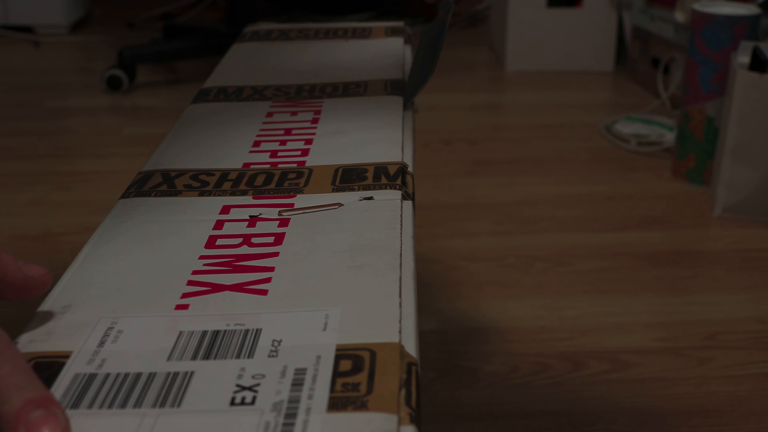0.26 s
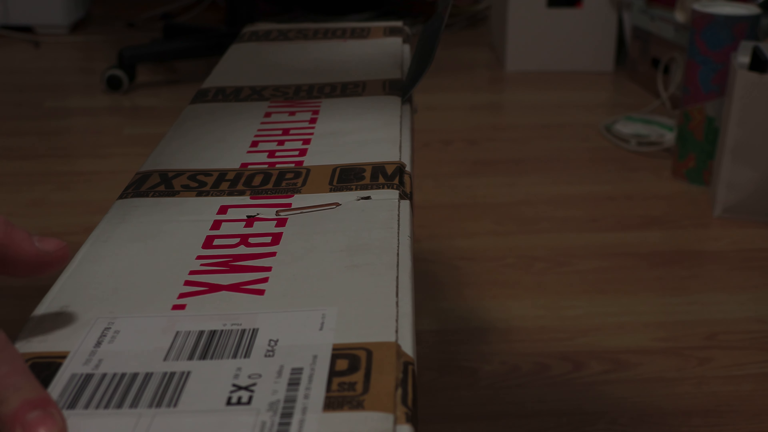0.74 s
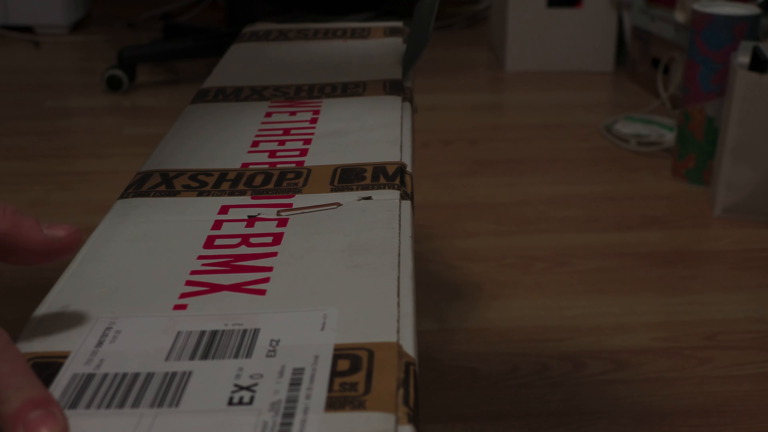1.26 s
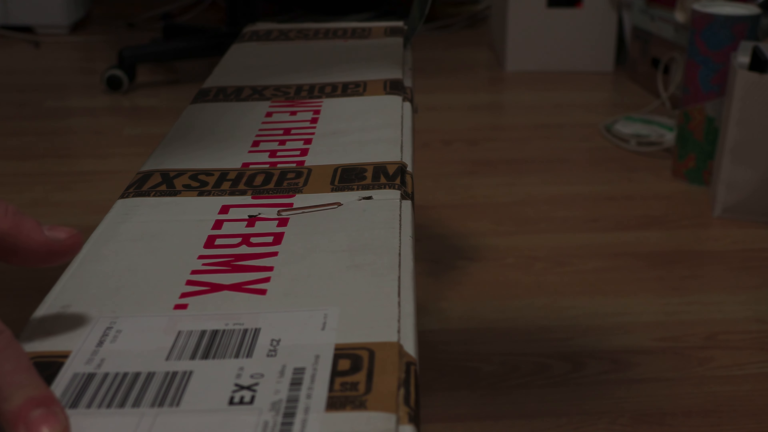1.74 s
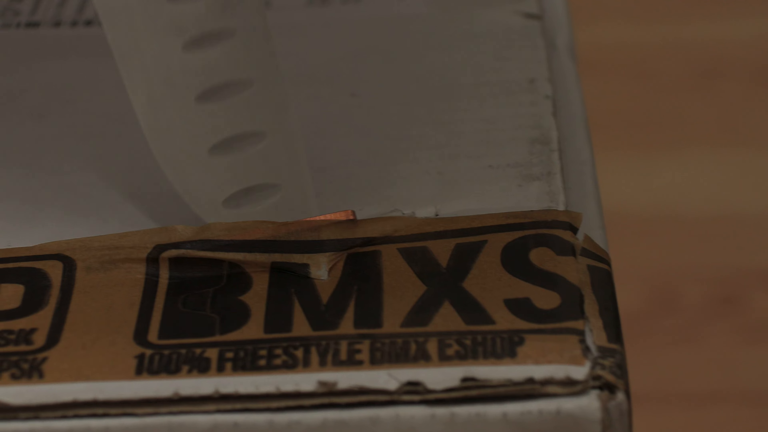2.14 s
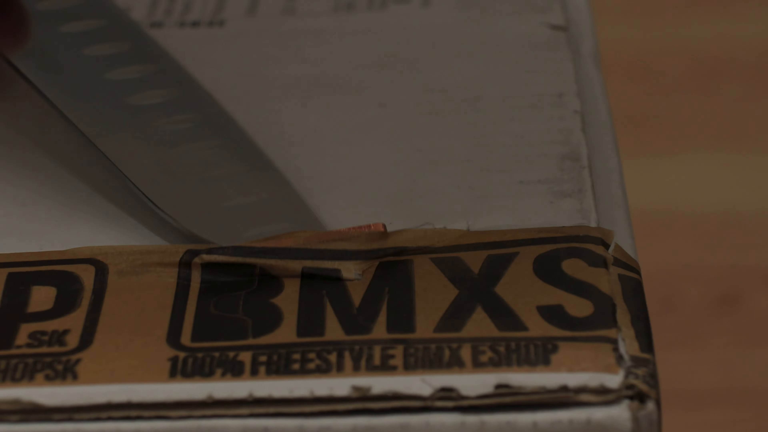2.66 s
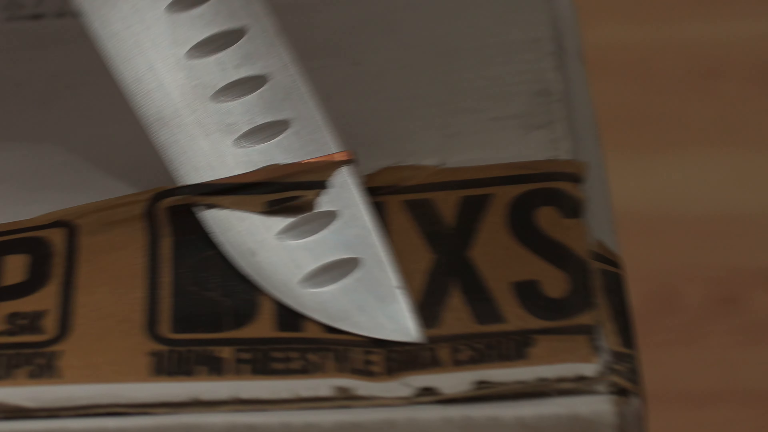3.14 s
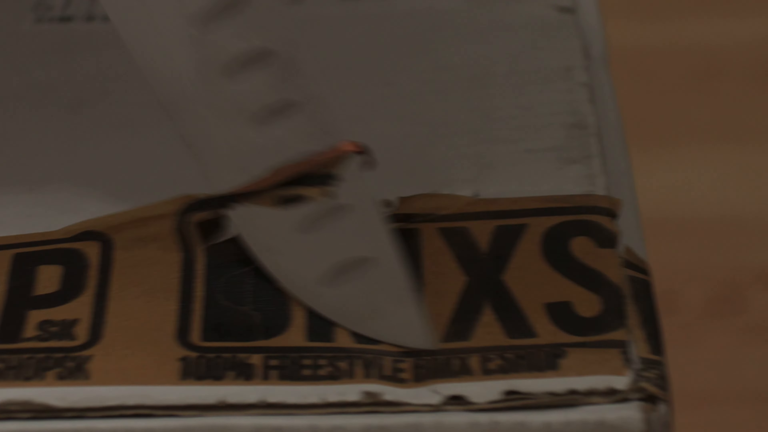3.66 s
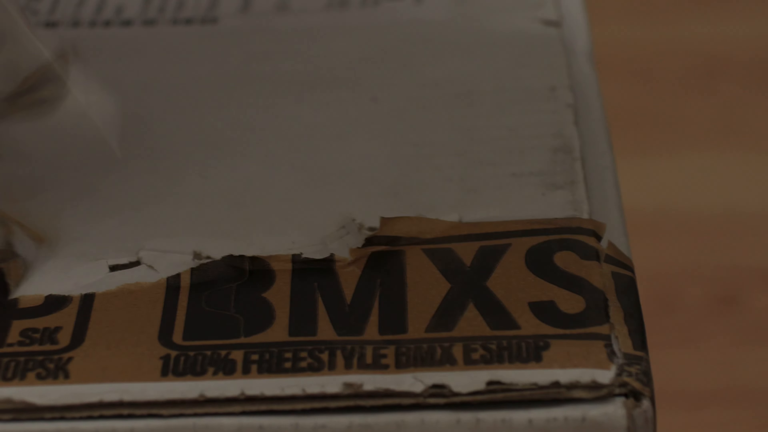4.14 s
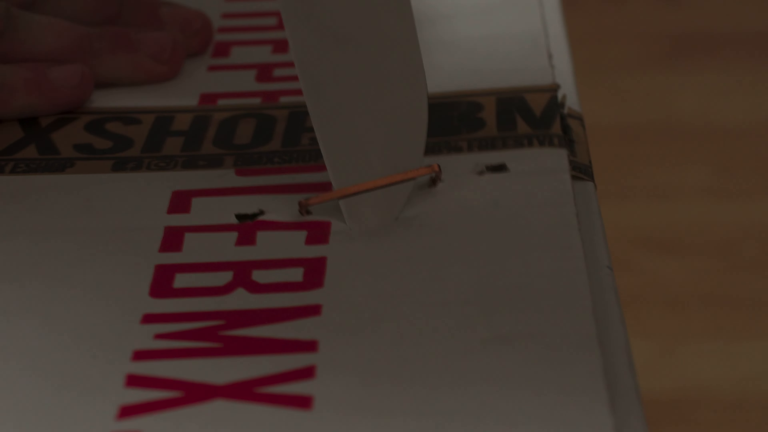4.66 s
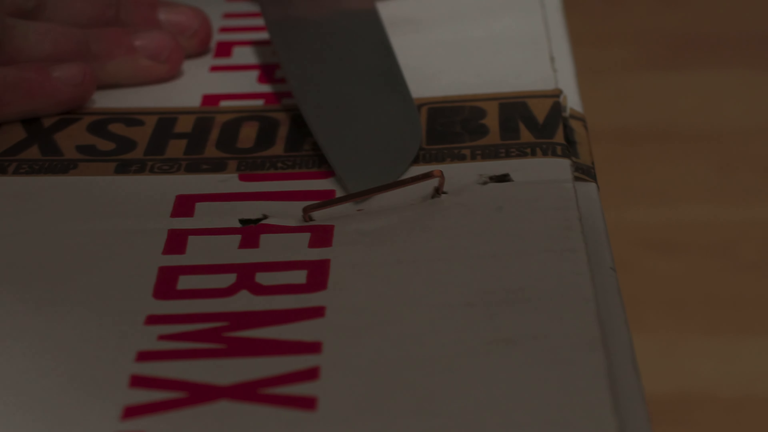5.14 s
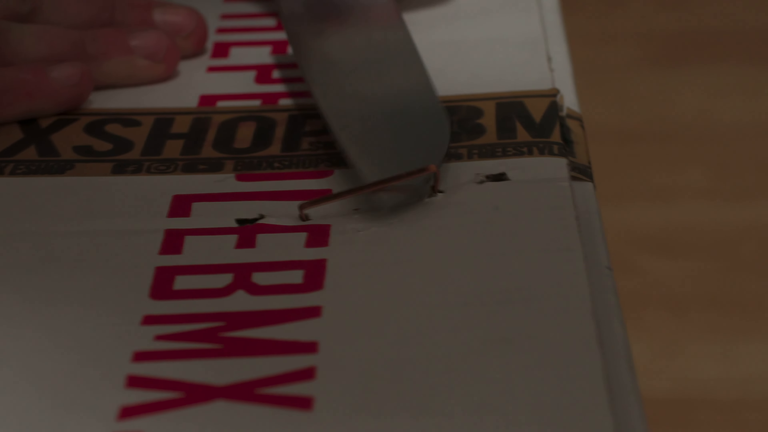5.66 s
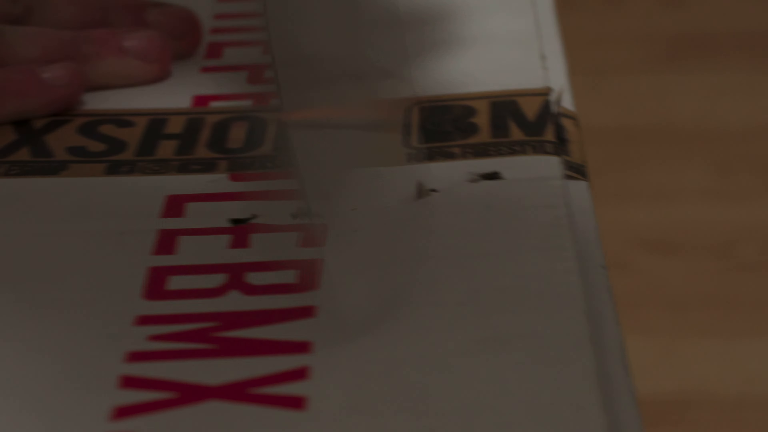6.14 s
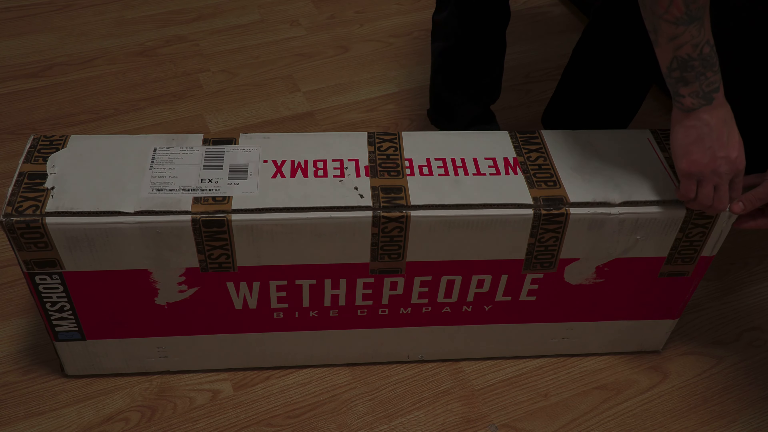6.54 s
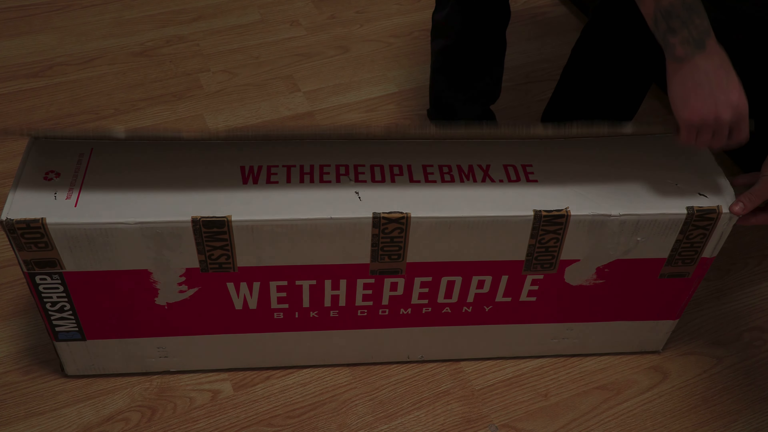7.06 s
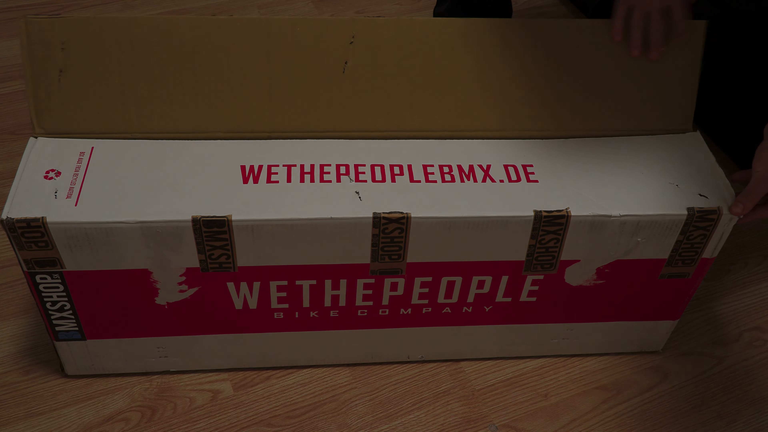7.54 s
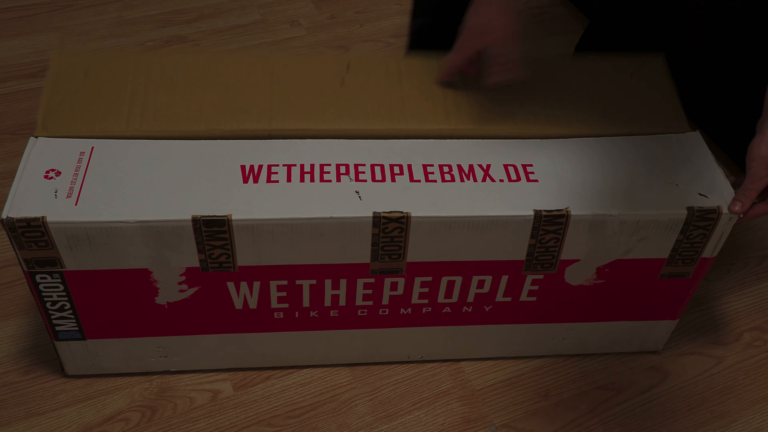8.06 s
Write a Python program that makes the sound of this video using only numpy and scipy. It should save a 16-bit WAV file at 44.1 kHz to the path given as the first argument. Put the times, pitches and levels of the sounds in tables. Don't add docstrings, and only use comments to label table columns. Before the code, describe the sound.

Quiet handling of a big cardboard carton comes first, then a loud tape crack and some knocks. The sound cuts abruptly to a blade grating against board, thudding and snapping through it in irregular bursts. More prying ends in a hollow boom and short metallic jingle. A last cut brings crisp lid pops, gentle cardboard rustle and soft bumps. Recorded near, in a lightly echoing room with low background hiss.

```python
import sys
import numpy as np
from scipy import signal
from scipy.fft import rfft, irfft, next_fast_len
from scipy.io import wavfile
from scipy.ndimage import uniform_filter1d

SR = 44100
rng = np.random.default_rng(int(sys.argv[2]) if len(sys.argv) > 2 else 0)


def invert_db(level):
    return 10 ** (np.asarray(level, dtype=float) / 20)


def pcm_store(signal):
    levels = np.round(np.clip(np.atleast_2d(signal), -1, 1) * 32767)
    wavfile.write(sys.argv[1], SR, levels.astype(np.int16).T)


N = 366453

SHOTS = [
    0,
    1.372,
    2.122,
    4.259,
    6.44,
    8.32,
]
# level in dB, shot by shot.
RESTING_DB = [-62, -50.5, -61.5, -57.5, -86]

# frequency in Hz, density in dB per Hz.
HUSH = [(18, -60), (30, -16), (210, 1.5), (384, 1), (584, 1.5), (1460, -7.5), (1670, -10.5), (2010, -9),
        (7870, -16), (14000, -31.5), (16000, -51)]
# frequency in Hz, width in Hz, level in dB.
WHINE = [(7710, 20, 0)]
# frequency in Hz, width in Hz, level in dB.
HOUSE_TONE = [(1730, 110, 0)]
# time in seconds, level in dB.
RUMBLE = [(0.0, -69), (0.76, -81), (1.39, -44.5), (2.27, -81), (2.98, -47), (3.49, -80), (3.82, -42.5),
          (4.58, -75), (6.87, -43), (7.15, -69), (7.98, -51.5), (8.31, -53)]
# frequency in Hz, t60 in seconds.
ROOM = [(200, 0.43), (1000, 0.37), (4000, 0.51), (12000, 0.2)]
# frequency in Hz, level in dB.
WIDTH = [(60, -33), (150, -33), (380, -18), (950, -9.5), (2400, -10.5), (6000, -7.5), (10000, -3.5),
         (14000, -11)]
# lower edge in Hz, upper edge in Hz.
MICROPHONE_HZ = [209, 10500]
# lower edge in Hz, upper edge in Hz.
PUSH_HZ = [45, 130]

# frequency in Hz, width in Hz, level in dB.
LOW_BOX = [(198, 86, -1), (254, 19.8, -7.5), (310, 47.5, -3.5)]
HIGH_BOX = [(404, 76, -1), (546.2, 37.4, -2.5), (657, 60, -1.5), (772, 80, -4.5), (877, 35, -11)]
# frequency in Hz, width in Hz, level in dB.
PANEL = [(1100, 410, -13), (1425, 740, 12), (1815, 880, 10.5), (2164, 1280, 10), (2660, 1170, 5.5)]
# frequency in Hz, level in dB, t60 in seconds.
BLADE = [(4650, -7, .9), (5100, -4, .9), (5480, -10.5, .9), (6105, -11, 1), (6700, -2, 1),
         (7440, -0.5, 0.83), (7540, 0.5, 0.55), (8800, -10, 0.7), (9950, -10, 0.61), (10450, -6, .6),
         (11900, -7, .6), (12400, -5.5, .6), (13880, 2.5, 0.26), (14500, -14, 0.44)]
# frequency in Hz, density in dB per Hz.
RASP = [(1470, -71), (2500, -10.5), (3180, -1.5), (4500, -2.5), (6200, -4.5), (8400, -12), (12300, -18),
        (14800, -18), (16000, -68)]

# start in seconds, peak in dB, frequency in Hz, t60 in seconds.
RINGS = [(1.415, -21, 619, 0.08), (1.43, -29, 375, 0.19), (1.51, -36, 506, 0.18), (1.608, -30, 518, 0.081),
         (1.612, -31, 610, 0.08), (1.65, -37, 552, 0.084), (5.03, -20, 207, 0.18),
         (5.355, -32.5, 228, 0.18), (5.626, -22, 1250, 0.16), (6.2, -11, 215, 0.13), (6.28, -23, 166.5, .5),
         (5.628, -16.5, 201.4, 0.16), (5.66, -24, 191, 0.13), (2.93, -16, 543, 0.16),
         (6.12, -34, 570, 0.076), (6.673, -28, 1420, 0.19), (6.676, -30.5, 1540, .33),
         (6.684, -30, 1665, 0.13), (6.686, -24, 1800, .15), (6.69, -38, 1910, 0.24),
         (6.861, -39, 303, 0.16), (7.607, -40, 1060, 0.087), (7.61, -41.5, 1770, 0.22),
         (8.15, -38, 585, 0.1), (7.866, -28, 198.4, 0.25), (7.95, -36, 230, 0.21)]
# start in seconds, peak in dB, strongest frequency in Hz, t60 in seconds.
THUMPS = [(0.315, -30.5, 470, 0.14), (1.093, -27.5, 460, 0.31), (1.38, -29, 500, 0.039),
          (1.413, -12.5, 203, 0.14), (1.605, -24, 209, 0.23), (1.744, -28.5, 532, 0.092),
          (2.619, -19, 390, 0.045), (2.915, -8.5, 708, 0.47), (2.944, -9, 630, 0.038),
          (3.727, -10.5, 550, 0.027), (3.846, -19, 510, 0.096), (3.856, -14.5, 650, 0.053),
          (4.198, -23, 333, 0.084), (4.451, -20.5, 278, 0.047), (4.478, -20, 310, 0.064),
          (4.976, -16.5, 617, 0.065), (5.021, -11.5, 261, 0.056), (5.101, -26, 310, 0.13),
          (5.349, -23.5, 220, 0.069), (5.62, -16, 268, 0.053), (6.189, -4.5, 245, 0.078),
          (6.672, -25, 240, 0.098), (7.864, -30, 198, 0.063), (8.131, -33.5, 404, 0.025),
          (2.913, -11.5, 419, 0.3), (2.916, -28, 940, .2), (2.927, -12, 660, 0.22),
          (2.966, -16.5, 890, 0.27), (2.98, -16, 692, 0.36), (2.93, -10.5, 404, 0.32),
          (2.935, -14, 1280, .2), (2.985, -17.5, 1340, 0.2), (2.995, -22.5, 396, 0.2), (2.95, -14, 955, .2),
          (3.062, -25, 663, 0.072), (3.727, -18, 664, 0.09), (3.765, -24, 700, 0.12),
          (3.844, -18, 436, 0.11), (5.62, -9.5, 542, 0.049), (5.635, -18.5, 235, 0.22),
          (6.222, -7, 182, 0.21), (7.889, -27, 220, 0.12), (7.91, -26.5, 130, 0.27), (6.2, -13, 565, 0.28),
          (3.099, -29, 130, 0.11), (4.815, -38.5, 400, 0.11)]
# start in seconds, strength in dB, gain in dB per octave away from 7
# kHz on either side.
RATTLE = [(4.195, -38, -2), (4.246, -38.5, 1), (4.978, -52, 10), (5.023, -59, 3), (5.3, -62, 16),
          (5.623, -40, 23), (5.654, -48, 6), (6.191, -29, 9), (6.21, -27, 13.5), (6.224, -27, 1),
          (6.236, -27, 6), (6.248, -29, 2), (6.262, -19.5, -2), (6.283, -33, 1), (6.298, -28, -10),
          (6.316, -34, 4)]
# time in seconds, peak in dB, ring in Hz, treble against peak in dB.
SNAPS = [(1.0929, -23.5, 2090, -27), (1.1458, 7, 2730, -27), (1.4132, -2.5, 4040, -15),
         (1.6072, -18.5, 2840, -13), (2.1535, -14.5, 4500, -20), (2.6229, 4.5, 3700, -11),
         (2.6384, -11, 3500, -9), (2.9158, -0.5, 2330, -57), (2.9447, -4, 2430, -25),
         (3.0649, -13, 2220, -38), (3.2101, -21, 5270, -14), (3.6998, -1.5, 4030, 17),
         (3.7289, -12, 1480, -15), (3.8462, -19, 3650, -1), (3.8536, -10, 1540, -29),
         (4.1051, -14, 4600, -18), (4.1114, -24, 1980, 1), (4.3405, -9.5, 2660, -9), (4.4518, -4, 4500, 3),
         (4.4817, 5.5, 5950, -5), (4.9766, -7.5, 1760, -5), (5.0225, -7.5, 2130, 2.5),
         (5.6211, 2, 1960, -24), (5.624, 0.5, 1210, -10), (6.1898, 3, 1677, -11.5), (6.6383, -7, 5340, -18),
         (6.6742, -2, 3380, -38), (6.688, -8, 1680, -40), (6.8593, -7, 4050, -29), (7.6086, -34, 1730, -25)]
# time in seconds, peak in dB, ring in Hz.
TICKS = [(0.0473, -22, 5800), (0.1755, -26, 6720), (0.205, -24, 8500), (0.6035, -30, 6940),
         (0.6489, -29, 3040), (1.5703, -25, 2040), (1.6482, -19, 6130), (1.7444, -24, 2990),
         (1.8497, -26, 2900), (2.2044, -21, 5000), (2.2268, -25, 4180), (2.2997, -23, 6270),
         (2.7841, -28, 3370), (2.9875, -12, 9000), (3.1173, -20, 2370), (3.1597, -26, 1930),
         (3.3543, -22, 5170), (3.9804, -23, 1990), (4.0562, -21, 2320), (4.3216, -23, 5170),
         (4.4169, -21, 7610), (4.9237, -24, 3000), (5.7823, -20, 5900), (7.862, -19, 7500),
         (2.8689, -9, 5500), (3.4047, -25, 3020), (3.5374, -24, 2380), (3.678, -25, 2310),
         (3.758, -18, 6500), (4.0302, -27, 2340), (4.129, -17, 4400), (4.149, -17, 2200),
         (4.165, -16, 2200), (4.283, -32, 9500), (4.301, -32, 9000), (4.3306, -19, 5360),
         (4.5695, -20, 5630), (4.584, -19, 6000), (3.657, -25, 9000), (5.638, -6, 4900), (5.655, -9, 3800),
         (6.1928, -3, 7740), (6.6039, -29, 6000), (6.124, -27, 7500), (6.1444, -23, 5200),
         (3.2205, -23, 6000), (7.525, -32, 5000), (7.6301, -28, 6000), (8.134, -36, 3000),
         (0.009, -24, 3000), (0.028, -23, 6000), (0.275, -27, 5500), (0.32, -26, 4500), (4.789, -30, 8000),
         (4.808, -29, 9000), (5.104, -28, 9500), (7.492, -34, 4000), (5.855, -20, 4300)]
# start in seconds, length in seconds, from Hz, to Hz, level in dB.
SQUEAKS = [(0.0, 0.065, 1550, 1610, -45), (.02, 0.057, 2800, 2810, -44), (.29, 0.066, 2860, 2880, -47.5),
           (4.945, 0.024, 1950, 2050, -43), (5.287, 0.068, 2710, 2670, -44),
           (5.799, 0.045, 3010, 2800, -39), (5.857, 0.11, 1950, 2420, -47), (5.888, 0.078, 975, 1100, -40),
           (5.963, 0.13, 1080, 1020, -42.5), (5.925, 0.069, 2600, 2870, -39),
           (5.93, 0.075, 3600, 3800, -39), (6.693, 0.13, 1500, 1450, -44), (6.677, 0.1, 1760, 1700, -40),
           (7.656, 0.17, 2480, 2850, -65)]

# start in seconds, panel note in Hz, its lift in dB,
# upper box modes in dB, top of the rasp in dB.
PLACES = [(0, 1580, -40, -5.5, 10.5), (1.146, 1790, -13, -1, -15), (1.374, 3900, -7, -3, 12.5),
          (1.5, 2880, -31, -2, 16), (2.14, 2610, -28, 5.5, 17.5), (2.84, 2400, -12, 4, 7),
          (2.915, 970, 1.5, 11.5, -8), (3.03, 1000, -32, 7.5, -9), (3.2, 2310, -30, 5, 7),
          (3.73, 1100, -2, 0, 13), (4.1, 2080, -3, 0, 10), (4.258, 2140, -1, 2, 15.5),
          (5.2, 2600, -17, -5, 8), (5.62, 4330, -8, -3, -3), (5.76, 2085, -13, 7.5, -3.5),
          (5.89, 1100, -3, -1.5, -4), (6.08, 1300, -15, 7.5, 2.5), (6.189, 1260, -6, 0, 6.5),
          (6.63, 1670, -1, -4, -39), (6.855, 4060, -8.5, 0, -17), (7.0, 1730, -17, -3, -10),
          (7.5, 1780, -14.5, 1.5, 7), (7.605, 1750, -6.5, -2, -3), (7.65, 2440, -22, 0, 8.5),
          (7.74, 2580, -41, -1, 18), (7.78, 5800, 2.5, -3, 18), (7.85, 2600, -42, -8.5, 16.5)]
# start in seconds, level in dB.
SINGING = [
    (0, -23),
    (1.146, -40),
    (4.1, -23),
    (4.95, -15),
    (5.06, -23),
    (5.62, -16),
    (5.779, -22),
    (6.195, -2),
    (6.44, -35),
    (7.75, -22),
]
# start in seconds, fade in seconds, rasp in dB,
# panel buzz over rasp in dB, box boom over rasp in dB.
JOLTS = [(0.0, 0.2, -35, 2, 3.5), (1.147, 0.14, -19, 0.5, -0.5), (1.378, 0.21, -47, 4, 7),
         (1.412, 0.23, -32.5, 3, 8), (2.154, 0.91, -49.5, 2, -24.5), (2.624, 0.11, -30.5, 4.5, 7.5),
         (2.868, 0.56, -28.5, -5, 0.5), (2.911, 0.12, -28.5, 16.5, 11.5), (3.695, 0.029, -28, -3, -14),
         (3.728, 0.15, -32, 8.5, 8), (3.846, 0.13, -26.5, 4, 7), (4.106, 0.28, -29, -1, 2.5),
         (4.452, 0.033, -36.5, 6, 18), (4.976, 0.12, -38.5, 7, 17.5), (5.622, 0.13, -19, 3, 1.5),
         (6.187, 0.22, -23, 3, 13.5), (6.638, 0.16, -23, 0, 3.5), (6.674, 0.11, -23.5, -4, 0),
         (6.86, 0.15, -28, -1.5, -4), (7.606, 0.36, -52, 10.5, -2), (7.864, 0.33, -50, -11, 18)]
# start in seconds, rise in
# seconds, fade in seconds, rasp in dB, box boom over rasp in dB.
HANDS = [(.08, 0.085, .2, -49, -8), (.165, 0.036, .15, -42, 2), (.24, 0.039, 0.14, -40.5, 5.5),
         (.3, 0.036, 0.23, -40, 3), (.579, 0.12, 0.18, -47.5, 10), (.931, 0.073, 1, -47, 4.5),
         (1.071, 0.027, 0.48, -38, 9), (1.148, 0.026, 0.17, -12, -11.5), (1.169, 0.039, 0.1, -13.5, -12),
         (1.591, 0.057, 0.21, -41, 6.5), (1.701, 0.047, 0.11, -41, 2), (1.921, 0.11, 0.081, -42, 10.5),
         (6.521, 0.15, 0.088, -43, 1), (7.041, 0.064, 0.059, -51, 7.5), (7.301, 0.097, 0.89, -53.5, -8),
         (7.461, 0.083, 0.81, -51, 8), (7.721, 0.1, 0.53, -43.5, 2.5), (8.121, 0.041, 0.12, -50.5, 10)]
# start in seconds, rise in seconds, fade in seconds, rasp in dB,
# box boom over rasp in dB.
PUSHES = [(2.169, 0.12, 0.054, -42.5, 0), (2.47, 0.018, 0.12, -49, 9.5), (2.701, 0.21, 0.46, -41, 2.5),
          (2.85, 0.056, 0.13, -19.5, -1.5), (2.929, 0.023, 0.035, -26, 13), (3.03, 0.19, 0.22, -50, 4),
          (3.251, 0.085, 0.36, -41.5, 0.5), (3.471, 0.089, 0.073, -37.5, 1.5),
          (3.641, 0.064, 0.13, -35.5, 5), (3.686, 0.011, 0.03, -26.5, -4), (3.921, 0.15, 0.35, -42.5, 6.5),
          (4.182, 0.18, 0.28, -46, 9), (4.291, 0.063, .11, -42, 3), (4.371, 0.068, 0.17, -44.5, 2),
          (4.478, 0.0067, 0.067, -33.5, 17), (4.541, 0.049, 0.095, -35.5, 2),
          (4.681, 0.071, 0.32, -51, 7.5), (4.901, 0.057, 0.037, -39, 6.5), (5.101, 0.046, 0.077, -43.5, 13),
          (5.246, 0.066, 0.086, -37.5, 5), (5.321, 0.03, 0.097, -38.5, 9.5), (5.573, 0.053, 0.045, -47, 6),
          (5.74, 0.21, 0.18, -24.5, 0), (6.103, 0.14, 0.12, -28.5, 3), (6.164, 0.015, .05, -24, -1),
          (6.188, 0.061, 0.11, -17, 2.5)]


def evened(x):
    return x / np.sqrt(np.mean(x ** 2) + 1e-20)


def smoothed(x, size):
    return uniform_filter1d(uniform_filter1d(x, size), size)


def read(points, hz):
    f, value = np.transpose(points)
    return np.interp(np.log(hz + 1), np.log(f + 1), value)


def steps(table, t):
    start, *columns = np.transpose(table)
    row = np.searchsorted(start, t, "right").clip(1) - 1
    return [column[row] for column in columns]


def add(mix, s, sound):
    part = mix[round(s * SR):][:len(sound)]
    part += sound[:len(part)]


def colour(x, points):
    size = next_fast_len(len(x))
    gain = invert_db(read(points, np.fft.rfftfreq(size, 1 / SR)))
    return irfft(rfft(x, size) * gain, size)[:len(x)]


def resonate(x, hz, width):
    r = np.exp(-np.pi * width / SR)
    return 2 * signal.lfilter([1 - r], [1, -r * np.exp(2j * np.pi * hz / SR)], x).real


def moving(x, hz, width):
    turn = np.exp(2j * np.pi * np.cumsum(hz) / SR)
    r = np.exp(-np.pi * width / SR)
    return 2 * (turn * signal.lfilter([1 - r], [1, -2 * r, r * r], x / turn)).real


def body(x, modes):
    size = next_fast_len(len(x))
    f = np.fft.rfftfreq(size, 1 / SR)
    shape = 0
    for hz, width, db in modes:
        detuning = (f - hz) / width
        shape = shape + invert_db(db) / np.sqrt(width) / (1 + 2j * detuning) / (1 + 1j * detuning)
    return evened(irfft(rfft(x, size) * shape, size)[:len(x)])


def floor():
    t = np.arange(N) / SR
    hush = invert_db(-57.5) * evened(colour(rng.standard_normal(N), HUSH))
    whine = invert_db(-76) * body(rng.standard_normal(N), WHINE)
    throb_db = 2.5 * evened(uniform_filter1d(rng.standard_normal(N), size=1500))
    house = invert_db(-66.5 + throb_db) * (t > SHOTS[4]) * body(rng.standard_normal(N), HOUSE_TONE)
    rumble = body(rng.standard_normal(N), [(66.5, 12, -1.6), (89.3, 10.0, -0.39)])
    rumble_db = np.interp(t, *np.transpose(RUMBLE)) - 12.0
    return hush + whine + house + invert_db(rumble_db) * rumble


def tail(seconds, stretch):
    hz, t, z = signal.stft(rng.standard_normal(int(seconds * SR)), SR, nperseg=128)
    t60 = stretch * read(ROOM, hz)
    x = signal.istft(z * invert_db(-60 * t / t60[:, None]), SR, nperseg=128)[1]
    return x / np.linalg.norm(x)


def room(send):
    out = np.zeros(N)
    echo = np.append(np.zeros(300), tail(0.48, 1.0))
    for a, b in zip(SHOTS, SHOTS[1:]):
        shot = send[round(a * SR):round(b * SR)]
        add(out, a, signal.fftconvolve(shot, echo)[:len(shot)])
    return out


def rings():
    out, t = np.zeros(N), np.arange(SR // 3) / SR
    for s, db, hz, t60 in RINGS:
        envelope = invert_db(db - 60 * t / max(t60, .02)) * (1 - np.exp(-t / 0.0024))
        add(out, s, envelope * np.sin(2 * np.pi * hz * t))
    return out


def thumps():
    out, t = np.zeros(N), np.arange(SR // 3) / SR
    modes = LOW_BOX + HIGH_BOX
    for (s, db, hz, t60), luck in zip(THUMPS, rng.standard_normal((len(THUMPS), len(modes)))):
        ring = np.sin(2 * np.pi * hz * t) * np.exp(-t * hz * 0.13)
        for (mode_hz, width, mode_db), u in zip(modes, luck):
            gain = invert_db(mode_db - 14.5 + 7.84 * u)
            shifted_hz = mode_hz * (1 + 0.045 * u)
            ring = ring + gain * np.sin(2 * np.pi * shifted_hz * t) * np.exp(-width * t * 1.5)
        ring = ring * invert_db(-60 * t / max(t60, .02)) * (1 - np.exp(-t / 0.00071))
        add(out, s + 0.00246, invert_db(db) * ring / abs(ring).max())
    return out


def blade():
    out, t = np.zeros(N), np.arange(SR // 4) / SR
    hz, mode_db, t60 = np.transpose(BLADE)[..., None]
    for (s, db, tilt_db), luck in zip(RATTLE, rng.random((len(RATTLE), 3, len(BLADE), 1))):
        chance_db = 10 * (luck[0] - .5)
        slope_db = tilt_db * abs(np.log2(hz / 7000))
        decay_db = -60 * t / (0.16 * t60)
        level = invert_db(db + mode_db + chance_db + slope_db + decay_db) * np.minimum(t / 0.0014, 1)
        carrier = np.sin(2 * np.pi * (hz * t + luck[1]))
        beat = np.cos(2 * np.pi * 0.0043 * hz * luck[2] * t)
        add(out, s, (level * carrier * beat).sum(0))
    return out


def cracks():
    out, t = np.zeros(N), np.arange(900) / SR
    rows = SNAPS + [tick + (-11.5,) for tick in TICKS]
    for (s, db, hz, top_db), noise in zip(rows, rng.standard_normal((len(rows), 900))):
        puff = (noise + 2 * (t < 1.2e-4)) * np.exp(-t / .0021)
        ring = resonate(resonate(puff, hz, 0.35 * hz), hz, 0.5 * hz)
        tick = resonate(puff, 5050, 4400.0)
        crack = ring / abs(ring).max() + invert_db(top_db + 17.5) * tick / abs(tick).max()
        over_db = 0.83 * (db + 7.5) - 14.0
        add(out, s + .0009, invert_db(over_db) * crack / abs(crack).max())
    return out


def slips(per_s, spread_db, smooth):
    size = invert_db(spread_db * np.minimum(rng.exponential(1, N), 2.9)) * (rng.random(N) < per_s / SR)
    return evened(size * rng.choice([-1, 1], N)) + smooth * rng.standard_normal(N)


def patchy(x, depth_db):
    z = signal.stft(x, nperseg=256)[2]
    across_hz = uniform_filter1d(rng.standard_normal(z.shape), size=3, axis=0)
    patches = uniform_filter1d(across_hz, size=9, axis=1)
    return evened(signal.istft(z * invert_db(depth_db * evened(patches)), nperseg=256)[1][:N])


def stroke_levels(t):
    rows = [(s, 0, fall, db, buzz_db, boom_db) for s, fall, db, buzz_db, boom_db in JOLTS]
    for s, rise, fall, db, boom_db in HANDS + PUSHES:
        buzz_db = 1.25 + 0.13 * boom_db
        rows.append((s, rise, fall, db, buzz_db, boom_db))
    resting_db = steps(list(zip(SHOTS, RESTING_DB)), t)[0]
    power = np.ones((3, 1)) * invert_db(2 * resting_db)
    for s, rise, fall, db, buzz_db, boom_db in rows:
        rise, fall = max(rise, 1e-4), max(fall, .04)
        shot_end = SHOTS[np.searchsorted(SHOTS, s, "right")]
        span = slice(round(max(s, 0) * SR), round(min(s + rise + 2 * fall, shot_end) * SR))
        u = t[span] - s
        fade_db = 20 * np.maximum(u - rise, 0) / fall
        shape = np.clip(u / rise, 0, 1) * invert_db(db - fade_db)
        power[:, span] += (invert_db([[0], [buzz_db], [boom_db]]) * shape) ** 2
    return 10 * np.log10(power)


def squeaks(rub):
    out = np.zeros(N)
    for s, length, from_hz, to_hz, db in SQUEAKS:
        part = rub[round(max(s, 0) * SR):][:round(length * SR)]
        u = np.linspace(0, 1, len(part))
        note = evened(moving(part, from_hz + (to_hz - from_hz) * u, 170))
        add(out, max(s, 0), invert_db(db) * np.sin(np.pi * u) * note)
    return out


def scraping():
    t = np.arange(N) / SR
    rasp_db, buzz_db, boom_db = stroke_levels(t)
    note_hz, note_db, upper_db, top_db = steps(PLACES, t)
    steel_db = steps(SINGING, t)[0]
    rub = patchy(slips(900., 2.6, 1.15), 1.7)
    flutter_db = 0.42 * evened(smoothed(rng.standard_normal(N), 300))

    rasp = evened(colour(rub, RASP))
    top = colour(rasp, [(6000, -16.0), (11000, -3.5)])
    steel_modes = [(hz * k, 70., db - 4 * (k > 1)) for hz, db, _ in BLADE for k in (1, 1.043)]
    rasp = rasp + (invert_db(top_db) - 1) * top + invert_db(steel_db) * body(rub, steel_modes)

    wander = .012 * evened(smoothed(rng.standard_normal(N), 2500))
    note = evened(moving(rub, note_hz * (1 + wander), 520))
    buzz = body(rub, PANEL) + invert_db(note_db) * note
    boom = invert_db(-upper_db / 2) * body(rub, LOW_BOX) + invert_db(upper_db / 2) * body(rub, HIGH_BOX)

    out = invert_db(rasp_db - 6.0 + flutter_db) * rasp
    out = out + invert_db(buzz_db - 7.5 + flutter_db) * buzz
    return out + invert_db(boom_db - 11.0) * boom + squeaks(rub)


def scene():
    t = np.arange(N) / SR
    near, knocks, steel = cracks(), thumps() + rings(), blade()
    steel = steel * (abs(t - 6.6) > 6.6 - SHOTS[4]) * (abs(t - 4.4) > 4.4 - SHOTS[3])
    knocks = knocks * (abs(t - 6.53) > 6.53 - SHOTS[4])
    echo = room(invert_db(-6.5) * near + invert_db(-7.5) * knocks + invert_db(-14.0) * steel)
    action = near + knocks + steel + scraping() + echo
    microphone = signal.butter(3, MICROPHONE_HZ, "band", fs=SR, output="sos")
    mid = signal.sosfilt(microphone, action) + floor()
    shove = signal.butter(2, PUSH_HZ, "band", fs=SR, output="sos")
    mid = mid + invert_db(-26) * signal.sosfilt(shove, abs(knocks))
    side = colour(signal.oaconvolve(mid, tail(.4, 0.39))[:N], WIDTH)
    return np.array([mid * invert_db(4.0) + side, mid * invert_db(3.5) - side])


def roll_off(x):
    return signal.sosfilt(signal.butter(12, 16380, fs=SR, output="sos"), x)


def record(dry):
    knee = 0.9
    over = np.maximum(abs(dry) - knee, 0)
    rounded = dry - np.sign(dry) * (over - (1 - knee) * np.tanh(over / (1 - knee)))
    return roll_off(rounded)


dry = scene()
out = record(dry)
pcm_store(out)
```